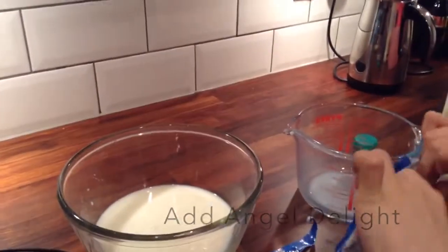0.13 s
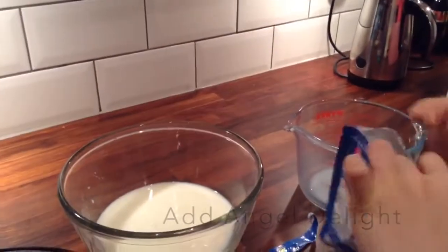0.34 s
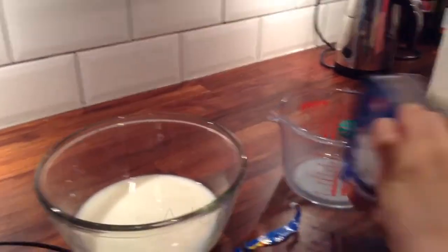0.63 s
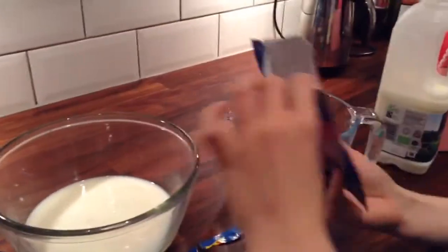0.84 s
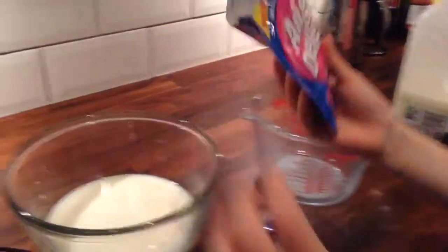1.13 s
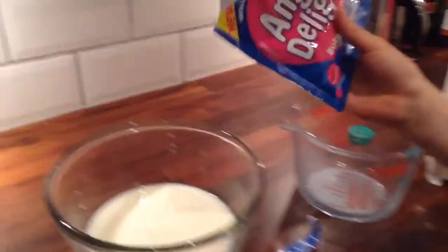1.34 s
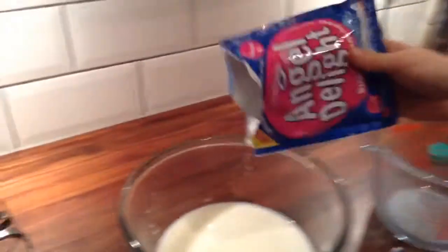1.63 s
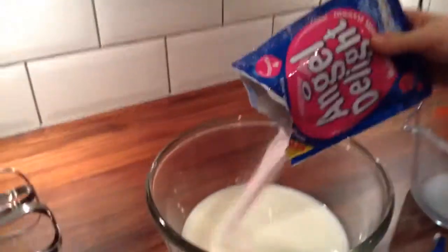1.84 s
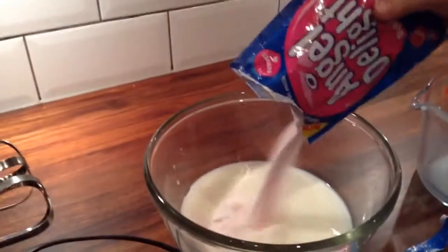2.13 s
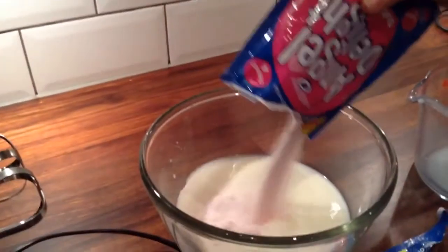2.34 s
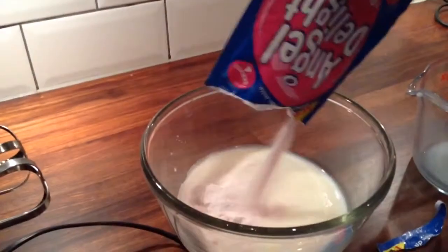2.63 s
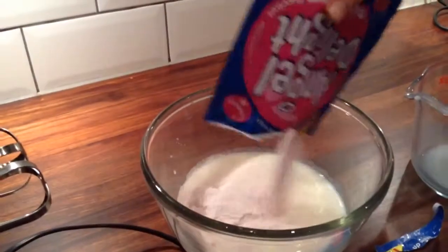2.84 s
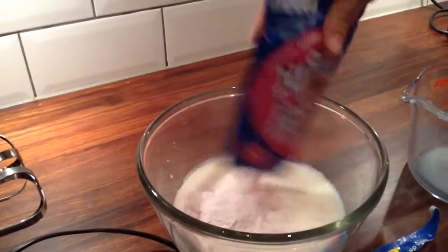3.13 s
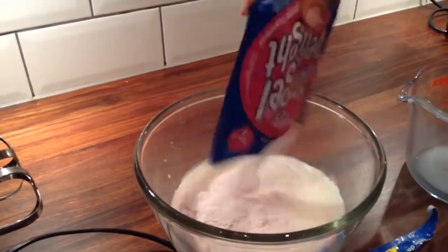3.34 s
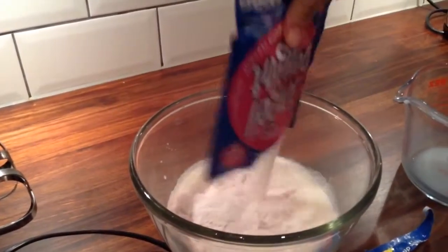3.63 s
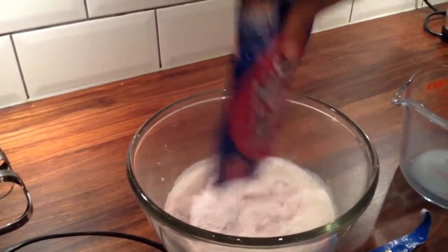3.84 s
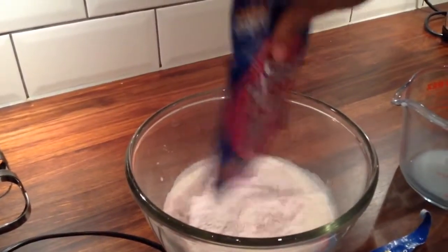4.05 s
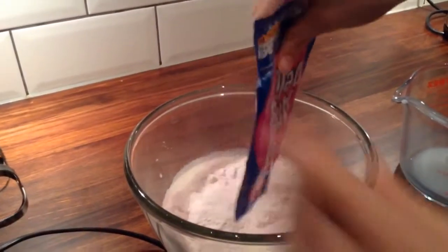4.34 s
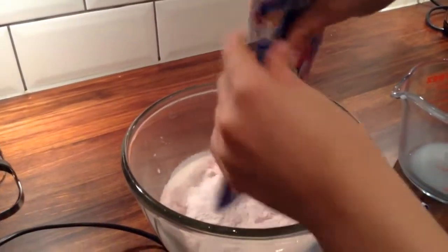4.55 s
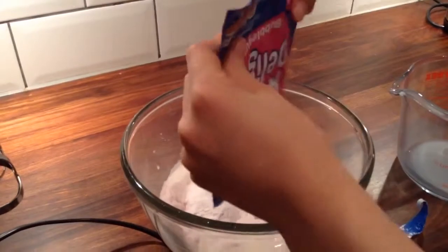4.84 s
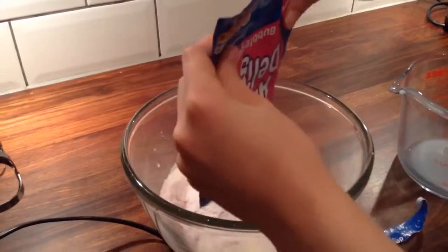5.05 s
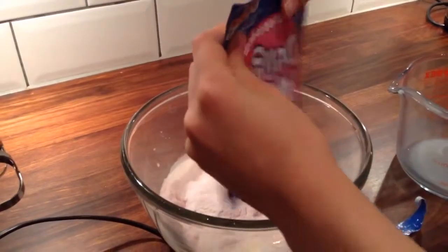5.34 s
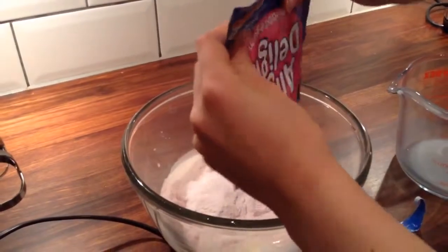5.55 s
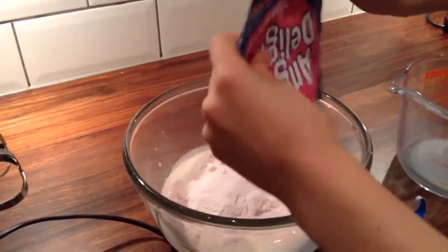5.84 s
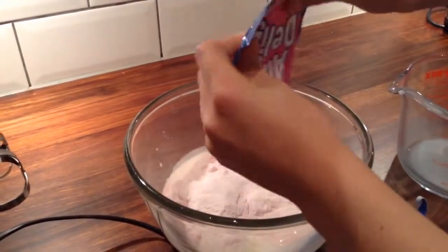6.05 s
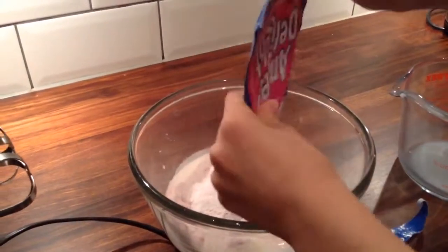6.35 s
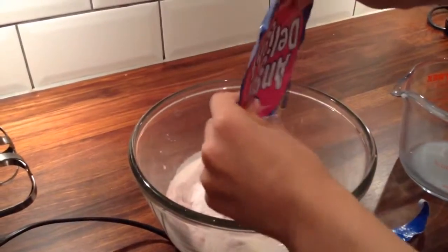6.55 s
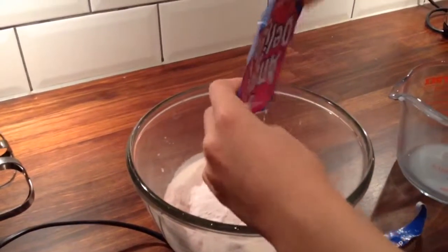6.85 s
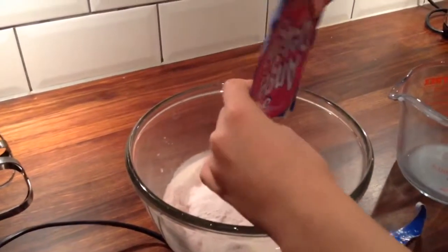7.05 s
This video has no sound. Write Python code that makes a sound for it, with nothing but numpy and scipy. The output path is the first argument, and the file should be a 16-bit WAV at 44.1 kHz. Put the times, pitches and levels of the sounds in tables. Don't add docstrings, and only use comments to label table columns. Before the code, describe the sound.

In a small tiled kitchen, heard closely, a plastic sachet rustles and is tugged at 0.1 seconds, then its seal snaps loudly near 0.4. Faint folds and crinkles follow at 0.7 to 1.0, with soft hand knocks around 1.4 to 1.75. From about 1.7 to 2.9 it is calmer: fine powder hisses in soft surges into a glass bowl, whose resonance tints the sound. At 3.1 to 3.9 shaking buckles the film, hardest near 3.4, with dull knocks and puffs of powder. A tight burst of bright crackles comes at 4.1, another very sharp one at 4.67. From 5.4 to about 6.8 kneading brings irregular crumples, ticks, rustles and hollow thuds, thinning to one last small crackle near 7.15. A short bright room tail and a faint, wavering low appliance hum remain beneath.

```python
import sys
import numpy as np
from scipy import signal
from scipy.fft import rfft, irfft
from scipy.io import wavfile

SR = 44100
rng = np.random.default_rng(int(sys.argv[2]) if len(sys.argv) > 2 else 0)


def file_out(sig):
    cols = np.atleast_2d(sig).T
    lim = np.clip(cols, -1, 1)
    pcm = np.round(lim * 32767).astype(np.int16)
    wavfile.write(sys.argv[1], SR, pcm)


def how_loud(loudness_db):
    steps = np.asarray(loudness_db, float) / 20
    return 10 ** steps


N = 317079


def rms_one(x):
    return x / np.sqrt(np.mean(x ** 2) + 1e-20)


def at_hz(points, hz):
    table_hz, values = np.transpose(points)
    return np.interp(np.log(hz + 1), np.log(table_hz), values)


def along(rows):
    return np.interp(np.arange(N) / SR, *np.transpose(rows))


def coloured(x, spectrum):
    size = 4096
    gain = how_loud(at_hz(spectrum, np.arange(size // 2 + 1) * SR / size))
    cepstrum = irfft(np.log(gain))
    cepstrum[1:size // 2] *= 2
    cepstrum[size // 2 + 1:] = 0
    taps = irfft(np.exp(rfft(cepstrum)))
    return signal.fftconvolve(x, taps / np.sqrt(np.sum(taps ** 2)))[:len(x)]


def resonance(x, hz, width_hz):
    r = np.exp(-np.pi * width_hz / SR)
    feed = np.array([1, 0, -1]) * (1 - r * r) / 2
    return signal.lfilter(feed, [1, -2 * r * np.cos(2 * np.pi * hz / SR), r * r], x)


def drift(rate_hz):
    r = np.exp(-2 * np.pi * rate_hz / SR)
    wander = signal.lfilter([1], [1, -2 * r, r * r], rng.standard_normal(N + SR))
    return rms_one(wander[SR:])


def grains(per_s, spread_db):
    sizes = how_loud(spread_db * np.minimum(rng.exponential(1, N), 4)) * rng.choice([-1, 1], N)
    return rms_one(sizes * (rng.random(N) < per_s / SR))


def surges(rows, rise_db_per_s, fall_db_per_s, rest):
    t = np.arange(0, N / SR, 1e-3)
    power = how_loud(2 * np.interp(t, *np.transpose(rest)))
    for start, db, hold in rows:
        rise = rise_db_per_s * np.maximum(start - t, 0)
        fall = fall_db_per_s * np.maximum(t - start - hold, 0)
        power = power + how_loud(2 * (db - rise - fall))
    return along(np.transpose([t, 10 * np.log10(power)]))


def creases(sharpness=6.3, ring_db=-1, crack_db=5, body=0.23):
    # (time [s], peak [dB], panel pitch [Hz], crack relative to ring [dB], room [dB])
    opening = [
        (0.119, -35, 1300, -23, -2),
        (0.167, -28.5, 1380, -18.5, -4.5),
        (0.358, -43.5, 880, -30, 6),
        (0.374, -21, 1530, -5.5, -9.5),
        (0.69, -56.5, 1940, -23, 9.5),
        (0.794, -43.5, 1370, -36, -2),
        (0.922, -38, 1310, -13.5, -2),
    ]
    shaking = [
        (3.139, -33, 1630, -39, -2),
        (3.174, -44.5, 1330, -5.5, -13),
        (3.344, -41, 1900, -19, 0),
        (3.36, -40.5, 1080, -13, 8.5),
        (3.373, -31.5, 1620, -7, 5.5),
        (3.387, -22.5, 1330, -18, -7.5),
        (3.592, -29, 1120, -37, -6),
        (3.651, -44.5, 670, -8, -1.5),
        (3.898, -51.5, 1470, -26, -20.5),
    ]
    squeezing = [(4.078, -22.5, 1870, -4.5, -4), (4.105, -23.5, 2040, -32, 1),
                 (4.133, -23.5, 1930, -1, -5.5), (4.149, -42, 1740, -28, -10), (4.29, -49.5, 1970, -0.5, 4),
                 (4.335, -31, 2130, -12.5, -1.5), (4.372, -34, 1125, -7, 0), (4.601, -43.5, 641, -3.5, -6),
                 (4.646, -34, 1275, -14.5, 2), (4.67, -19, 4940, -1.5, -2), (4.702, -41, 4500, -23, -7),
                 (4.858, -41.5, 1420, -18, 10.5), (4.872, -30, 2820, -20, -1.5), (4.907, -39, 1200, 2, 1.5),
                 (4.938, -38, 1150, 5.5, 1.1), (5.047, -39, 1110, -13, 0), (5.213, -51, 1100, 1, 5),
                 (5.229, -41, 1190, 1.5, -2), (5.327, -51.5, 1030, 2.5, 7.5)]
    kneading = [(5.418, -28.5, 1396, -16, -4), (5.558, -43.5, 1190, -40, -6), (5.641, -38.5, 636, -11, 2),
                (5.662, -35.5, 1460, -6, -1.5), (5.788, -35.5, 1510, 3.5, 4), (5.822, -31, 1060, -6, -5),
                (5.886, -35, 1034, -14, -14), (5.94, -46, 1090, 2, -7), (5.983, -29, 822, -5.5, 0.5),
                (6.036, -37.5, 1180, -6, -7), (6.142, -49.5, 744, -6.5, 6.5), (6.271, -49, 1100, -3.5, -2),
                (6.296, -54, 660, 5, 3), (6.361, -35.5, 1070, -8.5, 3), (6.476, -36.5, 1060, -0.5, 2.5),
                (6.496, -29, 3900, -9, -5.5), (6.521, -40.5, 1040, -3.5, -4), (6.671, -55, 1060, -8, 5.5),
                (6.723, -39.5, 1170, -7.5, -1), (6.753, -48.5, 1210, -1, 5), (7.15, -41, 1420, 0, -2)]
    # (time [s], peak [dB], panel pitch [Hz], crack relative to ring [dB])
    crumples = [(0.009, -40, 1110, -17.5), (0.057, -41, 1420, -9), (0.077, -44, 1000, -39),
                (0.193, -44, 1670, -36), (0.315, -42.5, 1400, -51), (0.728, -44.5, 860, -30),
                (0.964, -47.5, 855, -36), (2.26, -58, 3840, 0), (3.237, -50.5, 1090, -7),
                (3.764, -53, 4970, -3), (3.968, -49.5, 5860, -5), (4.584, -51, 610, -14),
                (4.628, -40, 544, -19), (4.952, -37, 532, -5.5), (5.191, -50.5, 1120, -13),
                (5.349, -41.5, 1100, -15), (5.379, -37.5, 626, -4.5), (5.396, -47, 720, 1.5),
                (5.766, -38, 1090, -9.5), (6.004, -51, 660, 5), (6.049, -36.5, 1160, -31),
                (6.09, -47, 1130, -17), (6.194, -44, 1090, -26), (6.224, -52, 670, -28),
                (6.386, -31, 1110, -10), (6.429, -40.5, 1090, -12), (6.79, -52.5, 1130, 3)]
    actions = {"opening": (0.0055, 0.32), "shaking": (0.0045, 0.095), "squeezing": (0.0056, 0.059),
               "kneading": (0.0076, 0.094), "crumpling": (0.011, 0.37)}
    # (frequency [Hz], level [dB per Hz])
    crack_colour = [(300, -18.5), (1000, -6), (2000, -1), (3200, -1.5), (5200, -2), (7000, -6),
                    (10000, -10), (15500, -23.5)]

    crumples = [(*row, -1.5) for row in crumples]
    tables = [opening, shaking, squeezing, kneading, crumples]
    rows = [(*row, *way) for table, way in zip(tables, actions.values()) for row in table]
    size = 3072
    t = np.arange(size) / SR
    ring, crack = np.zeros((2, N + size)), np.zeros((2, N + size))
    noises = rng.standard_normal((len(rows), size))
    for (start, peak_db, hz, bright_db, room_db, length, rise), noise in zip(rows, noises):
        swell = np.minimum(t / (rise * length), 1)
        decay = np.exp(-(t / length) ** 2) + 0.65 * np.exp(-5.0 * t / length)
        burst = slips(noise, swell * (decay + aftermath(t)))
        modes = signal.butter(2, [0.45 * hz, min(1.6 * hz, 7000)], "band", fs=SR)
        tone = resonance(burst, hz, hz / sharpness) + body * signal.lfilter(*modes, burst)
        tone[1] *= np.linalg.norm(tone[0]) / np.linalg.norm(tone[1])
        i = round(start * SR)
        ways = how_loud(peak_db + np.array([[0], [room_db]]))
        ring[:, i:i + size] += ways * how_loud(ring_db) * tone / np.max(np.abs(tone[0]))
        crack[:, i:i + size] += ways * how_loud(bright_db + crack_db) * burst
    panels = signal.sosfilt(signal.butter(2, 350, "high", fs=SR, output="sos"), ring[:, :N])
    return panels + [coloured(x[:N], crack_colour) for x in crack]


def slips(noise, envelope):
    burst = noise * envelope / np.max(np.abs(noise * envelope))
    tones = rfft(burst)
    return np.array([burst, irfft(tones / np.abs(tones)) * np.linalg.norm(burst)])


def aftermath(t):
    per_s, level_db, fade_s, tick_s = 140, -13.5, 0.0324, 0.0013
    chance, size = rng.random((2, len(t)))
    ticks = signal.lfilter([1], [1, -np.exp(-1 / (tick_s * SR))], (chance < per_s / SR) * size)
    return how_loud(level_db) * ticks * np.exp(-t / fade_s)


def rustle(sharpness=7.6, plain=0.5):
    # (time [s], rustle level [dB], hold [s])
    grips = [(0.0, -47.5, 0.023), (0.88, -56.5, 0.03), (1.85, -62.5, 0.49), (2.7, -64.5, 0.5),
             (3.28, -54, 0.51), (4.08, -45.5, 0.15), (4.64, -45, 0.093), (5.38, -54.5, 0.3),
             (5.87, -42, 0.032), (6.05, -48.5, 0.057), (6.49, -53.5, 0.11)]
    # (frequency [Hz], level [dB per Hz])
    film_colour = [(250, -41.5), (500, 9.5), (1100, 1), (2000, 6), (3200, -8), (5500, -17), (12000, -39)]
    clicks = grains(450 * how_loud(5.5 * drift(25)), spread_db=2.5)
    pitches = np.geomspace(500, 9000, 16)
    dealt = rng.integers(0, len(pitches), N)
    rings = 0
    for k, hz in enumerate(pitches):
        patch = clicks * (dealt == k) + 1e-18
        rings = rings + resonance(patch, hz, hz / sharpness) * np.sqrt(hz)
    film = rms_one(coloured(rms_one(rings) + plain * clicks, film_colour))
    level_db = surges(grips, rise_db_per_s=144, fall_db_per_s=57, rest=[(0, -79)])
    return how_loud(level_db - 13.5) * film


def powder():
    # (time [s], hiss level [dB])
    flow = [(0.0, -88), (0.6, -78.5), (1.5, -76.5), (1.72, -64), (2.2, -64), (2.52, -72.5), (2.7, -66.5),
            (3.0, -72), (4.3, -75), (4.6, -68.5), (4.9, -71), (6.5, -73.5), (7.19, -76.5)]
    # (time [s], hiss level [dB], hold [s])
    puffs = [(0.06, -64.5, 0.01), (0.14, -61.5, 0.013), (0.755, -63.5, 0.0067), (0.91, -66.5, 0.016),
             (1.75, -62.5, 0.005), (2.27, -60, 0.0074), (2.38, -62, 0.024), (2.85, -61, 0.014),
             (3.05, -57.5, 0.066), (3.26, -57, 0.046), (3.5, -59, 0.13), (3.77, -61, 0.0067),
             (3.98, -60, 0.015), (4.16, -58.5, 0.063), (4.36, -73, 0.023), (4.79, -65.5, 0.03),
             (5.36, -55.5, 0.011), (5.95, -64.5, 0.03), (6.45, -60, 0.036)]
    # (frequency [Hz], level [dB per Hz])
    hiss_colour = [(530, -19.5), (900, -25), (1120, -4), (2140, -8.5), (3860, -1), (9650, 0), (14700, -4),
                   (15400, 5.5), (16000, -68)]
    level_db = surges(puffs, rise_db_per_s=250, fall_db_per_s=140, rest=flow) + 0.43 * drift(1.6)
    return how_loud(level_db) * coloured(grains(9000, spread_db=3.0), hiss_colour)


def knocks_and_thuds(edge=1.0):
    # (time [s], peak [dB], pitch [Hz])
    knocks = [(0.147, -44.5, 162), (0.713, -46, 190), (1.444, -43, 184), (1.748, -38, 163),
              (2.048, -45, 168), (3.363, -34.5, 400), (3.59, -41.5, 367), (3.651, -46, 393),
              (4.183, -46, 240), (4.854, -45.5, 236), (5.373, -40.5, 343), (5.643, -39.5, 335),
              (5.887, -39, 358), (6.481, -35.5, 222), (6.721, -47.5, 237)]
    # (time [s], peak [dB], pitch [Hz])
    thuds = [(0.054, -46.5, 437), (1.55, -57, 178), (1.6, -50, 226), (2.998, -58, 224), (3.133, -47, 463),
             (4.026, -42, 245), (4.076, -47, 198), (4.128, -38, 229), (4.29, -50, 256), (4.34, -45, 220),
             (4.669, -41.5, 213), (4.892, -45.5, 194), (4.994, -48, 159), (5.046, -48, 345),
             (5.234, -45.5, 213), (5.785, -39, 338), (5.983, -56, 318), (6.035, -41.5, 298),
             (6.183, -45.5, 235), (6.225, -50, 368), (6.301, -47.5, 202), (6.384, -44, 337),
             (6.425, -53, 221), (6.781, -46.5, 337)]
    size = 3000
    out, t = np.zeros(N + size), np.arange(size) / SR
    for blows, cycles in [(knocks, 1.9), (thuds, 4.8)]:
        for start, peak_db, hz in blows:
            i, turns = round(start * SR), t * hz
            push = how_loud(-30 * turns / cycles) * np.sin(2 * np.pi * turns)
            overtone = how_loud(-45 * turns) * np.sin(2 * np.pi * 1.09 * turns)
            out[i:i + size] += how_loud(peak_db) * (push + edge * overtone)
    return out[:N]


def bowl(x, mix_db):
    # (frequency [Hz], width [Hz], level [dB])
    bands = [(741, 27, -2), (1090, 42, 4.5), (1518, 76, -4), (2040, 65, 2.5), (2620, 47, -11.5)]
    # (time [s], level [dB])
    over_bowl = [
        (0.0, -6),
        (1.2, -4),
        (1.7, -1),
        (7.19, 2),
    ]
    rings = 0
    for k, (hz, width_hz, db) in enumerate(bands):
        rings = rings + (-1) ** k * how_loud(db) * resonance(x, hz, width_hz)
    return x + how_loud(mix_db + along(over_bowl)) * rings


def kitchen(x, gap_s=0.0019):
    # (frequency [Hz], time to fall 60 dB [s])
    decay = [(300, 0.42), (800, 0.33), (2000, 0.3), (5500, 0.39), (12000, 0.19)]
    size = 22000
    t, tail = np.arange(size) / SR, 0
    for low in 100 * 2 ** np.arange(0, 7.4, .5):
        band = signal.butter(2, [low, low * np.sqrt(2)], "band", fs=SR, output="sos")
        fade = how_loud(-60 * t / at_hz(decay, low * 2 ** (1 / 4)))
        tail = tail + signal.sosfilt(band, rng.standard_normal(size)) * fade
    tail = tail * how_loud(2.2 * drift(61)[:size])
    tail = tail * np.clip((t - gap_s) / 0.0027, 0, 1)
    return signal.fftconvolve(x, tail / np.sqrt(np.sum(tail ** 2)))[:N]


def background():
    # (frequency [Hz], level [dB per Hz])
    floor_colour = [(15, -73), (25, -60), (48, -30), (70, -36), (141, -16), (229, -5.5), (344, -12.5),
                    (659, -17), (754, -21), (1650, -21.5), (2050, -26), (3250, -29), (5880, -34.5),
                    (14400, -46), (16000, -24)]
    hum_hz, hum_db, waver_db = 229, -74.5, 2
    phase = 2 * np.pi * np.cumsum(hum_hz + 1.85 * drift(1.6)) / SR
    hum = how_loud(hum_db + waver_db * drift(1.7)) * np.sqrt(2) * np.sin(phase)
    return how_loud(-68) * coloured(rng.standard_normal(N), floor_colour) + hum


def scene():
    near, around = creases() + rustle()
    rest = bowl(powder(), mix_db=9.5) + knocks_and_thuds()
    sent = bowl(around, mix_db=-18.0) + rest
    sway = np.pi * np.arange(N) / SR / 1.3
    room = kitchen(sent * np.cos(sway)) + kitchen(sent * np.sin(sway))
    handled = bowl(near, mix_db=4.5) + rest + how_loud(-3.5) * room
    thin = signal.sosfilt(signal.butter(6, 150, "high", fs=SR, output="sos"), handled)
    return (thin + background())[None]


def low_pass(x):
    return signal.sosfilt(signal.butter(12, 16480, fs=SR, output="sos"), x)


def record(dry):
    cut = signal.sosfiltfilt(signal.cheby2(10, 30, 15600, fs=SR, output="sos"), dry)
    mix = cut + how_loud(-26.5) * (dry - cut)
    return low_pass(mix)


dry = scene()
out = record(dry)
file_out(out)
```